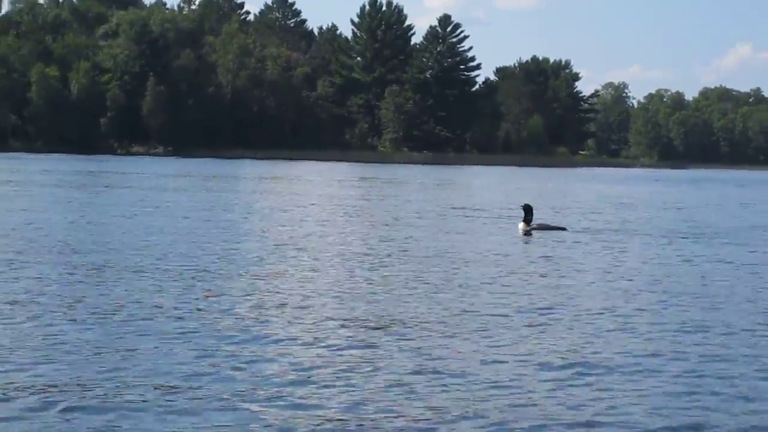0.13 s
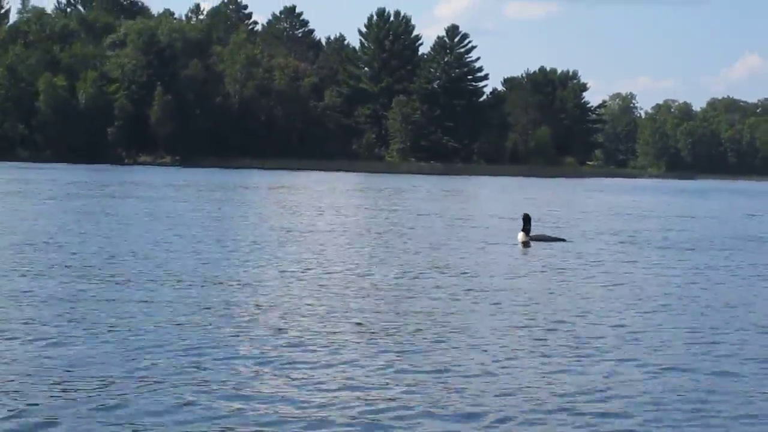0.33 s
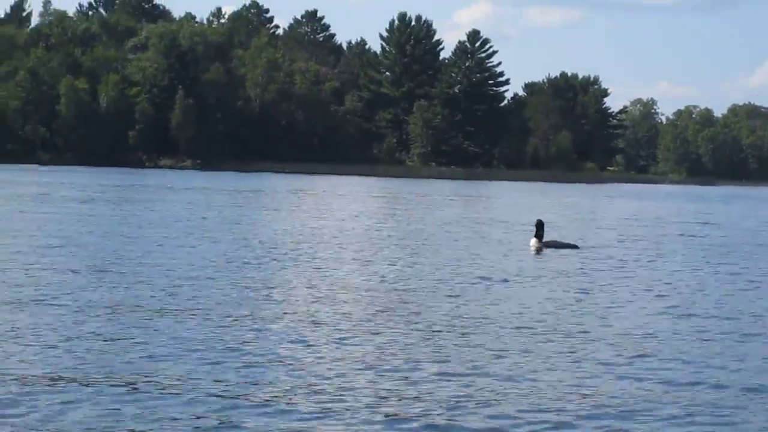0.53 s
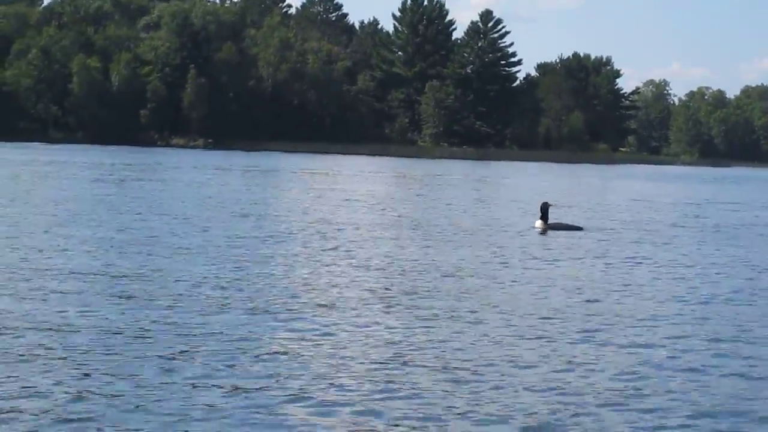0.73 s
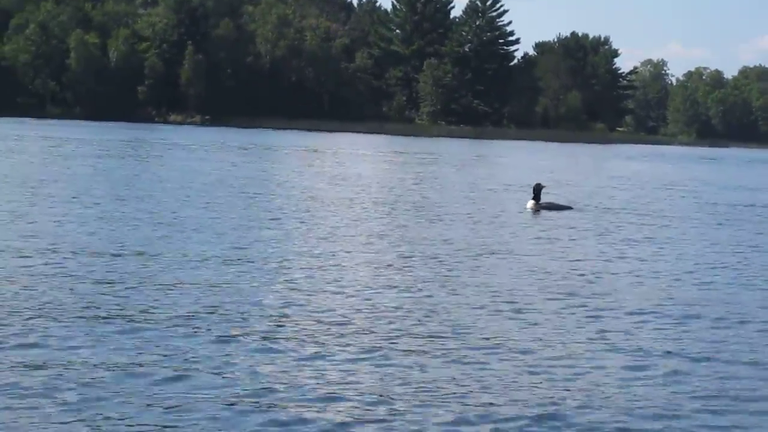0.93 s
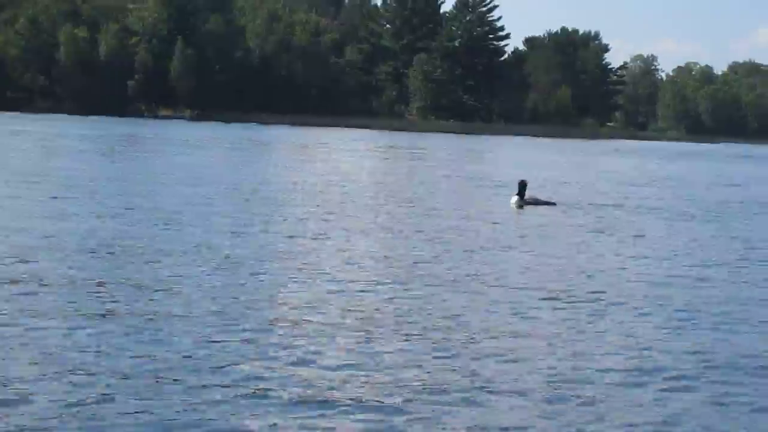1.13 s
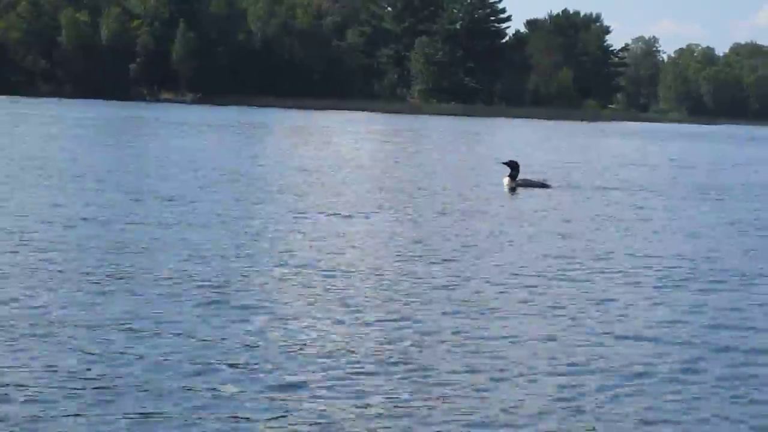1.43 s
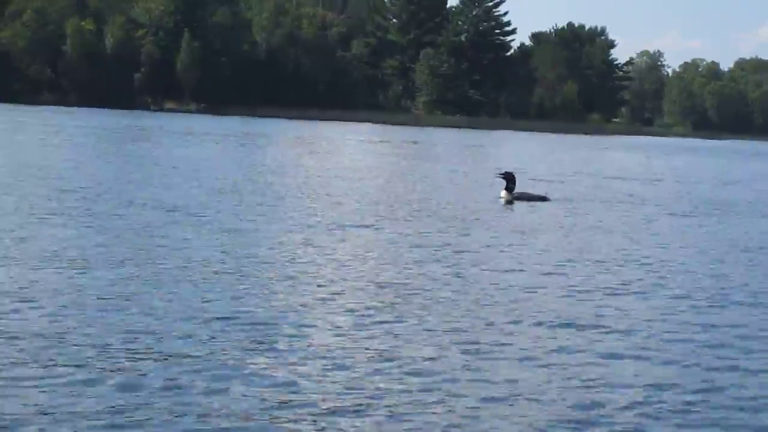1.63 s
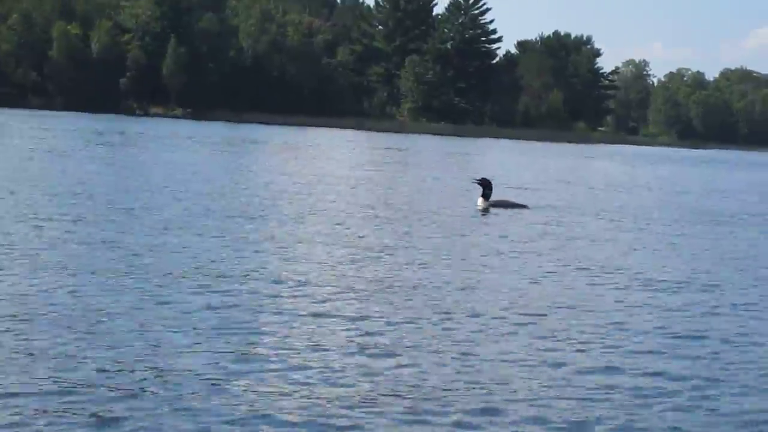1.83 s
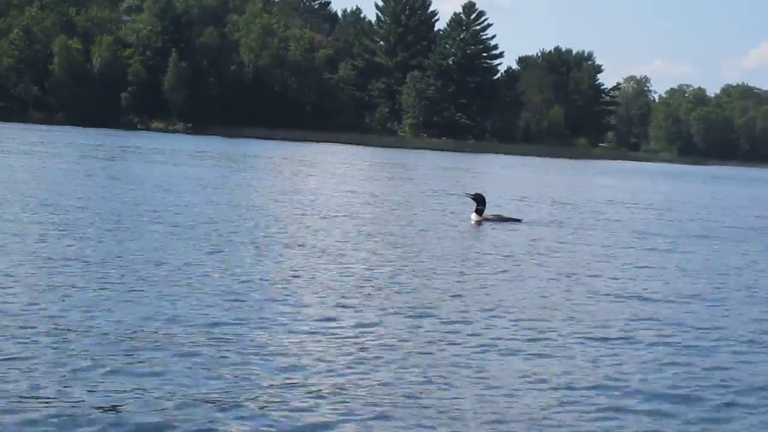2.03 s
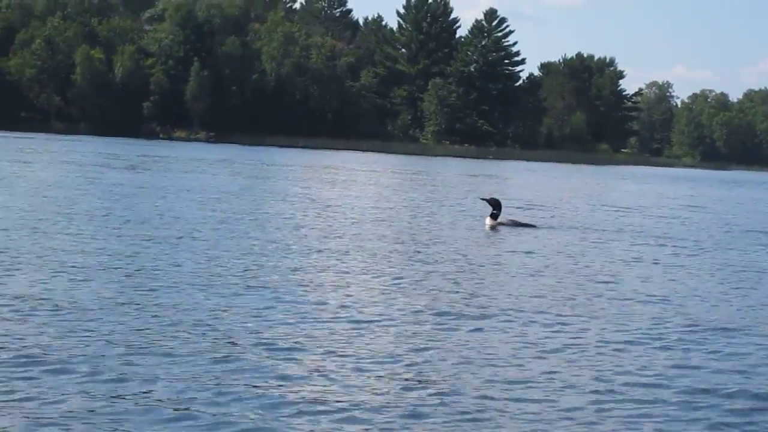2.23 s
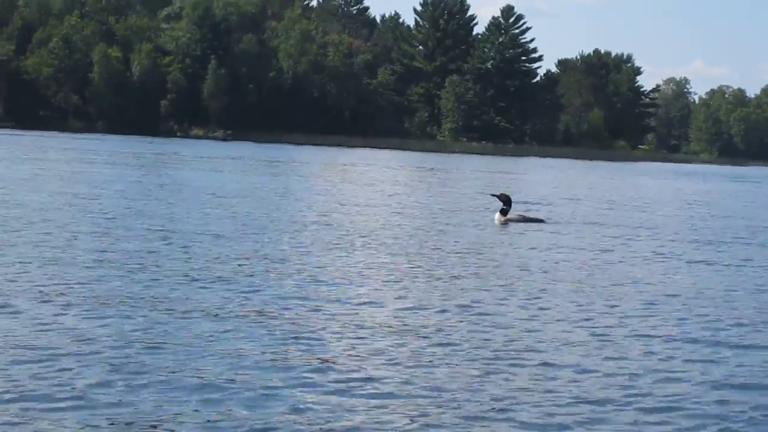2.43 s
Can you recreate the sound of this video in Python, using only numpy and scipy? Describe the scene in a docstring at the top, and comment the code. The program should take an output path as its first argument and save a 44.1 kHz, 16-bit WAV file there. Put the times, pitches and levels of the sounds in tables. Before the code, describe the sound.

A loon's tremolo calls dominate. Soft air and water wash with faint camera motor hum and thin whine opens alone. At 0.23 seconds a short low note breaks up into a loud, clear quaver, swinging rapidly about ten times a second until 0.83, then a faint low sigh. Only background and slight wind bumps follow. A similar, slightly longer call runs 1.7 to 2.35; the wash closes, ending around 2.6.

```python
"""First comes a soft wash of air and water with the hum of a camera's motors; then a loon calls twice.
Each call is a low note, a break up to a high quaver and a low sigh, built from overtones on a swinging pitch.
The wash is shaped noise, the hum is two sets of sines with a thin whine on top, and wind adds low bumps.
A fast gain control presses everything down under the loud tops of the quaver."""
import sys
import numpy as np
from scipy import signal
from scipy.io import wavfile
from scipy.ndimage import uniform_filter1d

SR = 44100
rng = np.random.default_rng(int(sys.argv[2]) if len(sys.argv) > 2 else 0)


def convert_level_to_amplitude(level_db):
    """Map a level in decibels to its linear amplitude factor."""
    exponent = np.asarray(level_db, float) / 20
    return 10 ** exponent


def dump_mix(stems):
    """Bounce the given channels to the path in sys.argv[1] as a 16-bit WAV at rate SR."""
    frames = np.atleast_2d(stems).T  # one column per channel
    limited = np.clip(frames, -1, 1)  # hard clip at full scale
    pcm = np.round(limited * 32767).astype(np.int16)
    wavfile.write(sys.argv[1], SR, pcm)


N = 114660  # length in samples

# Turning points of the three parts of each call, one list per call; the levels add to the voice below
# [t/s, pitch f/Hz, effort level/dB, second overtone level/dB, higher overtones level/dB]
LEAD_IN_NOTES = [
    [(.226, 678, -50, -15, -7.5), (.238, 664, -35.5, -3.5, -4), (.244, 702, -24.5, 3, -3),
     (.262, 724, -24, 1.5, 4.5), (.285, 696, -25, -6.5, 4), (.303, 640, -33.5, -8, 0),
     (.322, 685, -22, -9.5, 1.5), (.336, 784, -17.5, -2, 2), (.344, 843, -16, 3, -6.5),
     (.349, 900, -34.5, 17, 0)],
    [(1.68, 641, -44, 5.5, -2), (1.695, 644, -36, -7.5, -10), (1.702, 706.5, -24.5, 4, -1.5),
     (1.722, 738.6, -20.5, 1, 2.5), (1.745, 703, -25, -7.5, 0), (1.764, 665, -28, -11, 0),
     (1.778, 704, -20, -9.5, -0.5), (1.786, 779, -15.5, -5, -2), (1.792, 841, -20, 4, 1.5),
     (1.797, 900, -32, -7, -6)],
]
QUAVER_NOTES = [
    [(.345, 1215, -33.5, -11, -2), (.351, 1200, -14.5, 4, -5.5), (.358, 1175, -13.5, 4, 3),
     (.402, 886, -15.5, -2, -22), (.454, 1206, -14, 3.5, 5), (.501, 882, -17.5, 1, -17.5),
     (.553, 1204, -12, 3.5, 6), (.603, 873.6, -16.5, -2.5, -16.5), (.658, 1176, -12.5, 4, 4),
     (.714, 873, -18, -4, -17.5), (.74, 933, -21, 5, -13), (.771, 1070, -16.5, 5, 0),
     (.805, 950, -20, -27, -20), (.832, 870, -30.5, -8, 3)],
    [(1.791, 1230, -37, -11, -9), (1.799, 1216, -13.5, -7, -4), (1.815, 1211, -12, 4, 1),
     (1.86, 914, -16, -6.5, -13.5), (1.908, 1238, -11, 13, 1), (1.959, 939, -16, -8.5, -13.5),
     (2.005, 1237, -12.5, 11, 1), (2.057, 922, -17, -11, -16.5), (2.105, 1220, -9, 8.5, 0),
     (2.155, 909, -14, -11, -16.5), (2.207, 1173, -12, 4, 2), (2.262, 914, -17.5, -15, -18.5),
     (2.307, 978, -20, -3, -17.5), (2.328, 950, -20.5, -17, -32), (2.348, 900, -30, -6, -13)],
]
SIGH_NOTES = [
    [(.82, 645, -45, 0, -9), (.83, 603, -39.5, 0, -7), (.845, 592, -41, 0.0062, -1),
     (.864, 560, -48, 0, -5), (.88, 564, -45, 0, -9)],
    [(2.34, 625, -54, 0.0077, -14), (2.35, 602, -37, 0, -10), (2.358, 600, -42, 0.0092, -9),
     (2.368, 580, -74, 0.0051, -9)],
]
# Strength of each overtone in the low notes and in the quaver [multiple of the pitch, level/dB]
LOW_OVERTONES = [(1, -1.5), (2, 1), (3, -18), (4, -27), (5, -29), (6, -33), (7, -29.5), (8, -32.5),
                 (9, -40.5), (10, -33), (11, -31.5), (12, -36), (13, -55), (14, -40), (15, -47), (16, -53),
                 (17, -53), (18, -52), (19, -59)]
HIGH_OVERTONES = [(1, 1.5), (2, -18), (3, -22), (4, -25), (5, -34.5), (6, -43), (7, -32), (8, -38.5),
                  (9, -43), (10, -63), (11, -47.5), (12, -59.5)]
# Resonances of windpipe and throat [f/Hz, level/dB]
THROAT_COLOUR = [(600, 7.5), (900, -1.5), (1000, 3), (1120, 6), (1230, 7), (1450, 4), (1800, -10),
                 (2500, -9), (2900, -0.5), (3250, 10.5), (3600, -1.5), (4300, 2.5), (4800, -1.5), (5200, 5),
                 (5600, -2), (6000, -4.5), (6500, 0), (7200, -9.5), (8500, -3.5), (11000, 2),
                 (12300, -19.5), (13500, 1), (15500, 5.5)]
# The bird's head is turned differently in each call, one row per call
# [anti-resonance f/Hz, its lift on a steep climb f/Hz, treble colour as a list of [f/Hz, level/dB]]
HEAD_TURNS = [(1074.4, 11.3, [(1500, -0.5), (2400, -4.5), (3200, 1), (4500, -1.5), (6000, -4.5),
              (8500, -5.5), (13000, -7)]), (1067, 2.6, [(1500, 0), (2400, -3.5), (3200, -5), (4500, 0),
              (6000, 0), (8500, -1), (13000, -1.5)])]
# Overtones that swell or break off as the pitch passes certain heights
# [pitch f/Hz, second level/dB, third and fourth level/dB, higher level/dB]
SHOULDER_BREAKS = [(890, 1, 1, 2.5), (900, -3.5, -1, -4), (950, 2.5, 4.5, 1.5), (974, -0.5, 3, 6),
                   (1045, 1, -0.5, -2), (1096, -4.5, -5, 7), (1154, -4, -7.5, -2.5), (1252, 3.5, -6, 2.5),
                   (1200, 1, 0, 1.5), (1215, -3, -3.5, 5)]
# Soft low bumps of wind on the microphone [t/s, peak level/dB, length t/s]
WIND_BUMPS = [(.54, -49, 0.036), (1.45, -49, .05), (1.58, -46, 0.032), (2.174, -42.5, 0.14),
              (2.325, -46.5, 0.092)]
# Overtones of the two camera motors [multiple of the motor's frequency, level/dB]
DRIVE_OVERTONES = [(2, -62), (3, -54.5), (6, -48.5), (9, -53), (10, -49.5), (12, -59.5), (13, -51.5),
                   (17, -60.5), (18, -54.5), (19, -59.5), (20, -55), (24, -62), (26, -58), (28, -58),
                   (31, -61), (32, -71), (33, -76), (40, -67.5)]
SPINDLE_OVERTONES = [(1, -53.5), (2, -44.5)]
# Thin wobbling whine of the camera [f/Hz, level/dB before it pulses]
WHINE_TONES = [(3535, -68), (5285, -77.5), (5430, -71), (5572.8, -69.5), (5845, -72.5), (6147, -78),
               (7867, -75)]
# Colour of the air and water wash, only its shape counts [f/Hz, level/dB per Hz]
WASH_COLOUR = [(15, -40), (30, -27), (70, -6), (140, -10), (280, -3.5), (450, -3.5), (800, -1.5),
               (1000, -3), (1200, 0), (1500, -7.5), (1850, -9.5), (2200, -13), (3000, -20), (3350, -24.5),
               (3550, -25), (4500, -28.5), (5500, -30), (6500, -32.5), (10000, -35), (15500, -41.5)]
# Loudness of the wash over time [t/s, level/dB]
WASH_LOUDNESS = [(0, -37), (0.501, -38), (1, -37), (1.35, -37.5), (1.701, -37.5), (2.2, -37.5),
                 (2.6, -40.5)]

# "climb" runs from -1 (pitch falling steeply) to 1 (rising steeply)
CLIMB_SCALE_HZ_PER_S = 4000
RISE_DB = -1  # times climb: softer on the way up, louder on the way down
BROADNESS = 1.4  # above 1: the quaver lingers high and hurries through its dips
CORNER_S, EDGE_S = .004, .003  # smoothing of the pitch corners; fade at each end of a note
JITTER = 0.002  # rms share of the pitch
BREATH_DB = -24.5  # noise around the pitch, before the note's effort
RASP_DB, RASP_RISE_DB = -44, 0.5  # breath hiss, before effort; the rise is times climb
STEEPER = 0.088  # each higher overtone follows its column by this much more
OVERTONE_RISE_DB = 4  # for the third overtone on a steep rise
LOW_DULLING_DB, HIGH_DULLING_DB = 0.7, 1.4  # taken off that rise for each further overtone
SHIMMER_DB, CLIMB_SHIMMER_DB = 1.6, 1.2  # random flicker of the overtones; the extra is for rising
DEAD_WIDTH_HZ, DEAD_FILL_HZ = 100, 5.7  # anti-resonance: width, and how far its bottom is filled
DEAD_NARROWING = 0.17  # share of its width lost on a steep rise, gained on a fall
BUMP_LOW_HZ, BUMP_TOP_HZ = 30, 90
DRIVE_HZ, SPINDLE_HZ = 64.1, 157.8
HUM_WAVER_DB, HUM_WAVER = 1, 0.00086  # rms waver in level, and as a share of the frequency
WHINE_WOBBLE_HZ, WHINE_SWING_RAD, WHINE_PULSE = 29.97, 1.3, .4  # pulse as a share of the level
SCAN_HZ, SCAN_DB = 15734, -84.5
PATCHY_DB = 1.5  # rms unevenness of the wash
KNEE_DB, ATTACK_S, RECOVER_DB_PER_S = -15.5, .004, 200  # gain control


def evened(x):
    """Scales a sound so that its average strength (rms) is 1."""
    return x / np.sqrt(np.mean(x ** 2) + 1e-20)


def read(points, hz):
    """Reads a level between table points, with frequency on a log axis as in hearing."""
    f, value = np.transpose(points)
    return np.interp(np.log(hz + 1), np.log(f + 1), value)


def drift(rate_hz, count=N):
    """Random wandering of rms 1: noise with everything faster than rate_hz smoothed away."""
    settle = SR // 4  # skip the filter's start
    noise = rng.standard_normal(count + settle)
    return evened(signal.lfilter(*signal.butter(2, rate_hz, fs=SR), noise)[settle:])


def add(mix, s, sound):
    """Mixes a sound in at s seconds, since sounds in air simply add up."""
    part = mix[round(s * SR):][:len(sound)]
    part += sound[:len(part)]


def pitch_curve(t, s, pitch):
    """Swings the pitch smoothly from one turning point to the next, in Hz."""
    place = np.interp(t, s, np.arange(len(s)))
    k = np.minimum(place.astype(int), len(s) - 2)
    up = pitch[k + 1] > pitch[k]
    height = np.where(up, place - k, 1 - place + k)
    arc = np.sin(np.pi / 2 * (1 - (1 - height) ** BROADNESS)) ** 2
    hz = np.minimum(pitch[k], pitch[k + 1]) + abs(pitch[k + 1] - pitch[k]) * arc
    return uniform_filter1d(hz, round(CORNER_S * SR))


def breath(turns, climb):
    """Leaking air: noise that rides on the pitch, plus a band of hiss."""
    on_pitch = convert_level_to_amplitude(BREATH_DB) * drift(200, len(turns)) * np.cos(turns)
    band = signal.butter(1, [2500, 7000], "band", fs=SR)
    hiss = evened(signal.lfilter(*band, rng.standard_normal(len(turns))))
    return on_pitch + convert_level_to_amplitude(RASP_DB + RASP_RISE_DB * climb) * hiss


def note(points, voice, dulling_db, dead_hz, lift_hz, colour):
    """The voice sounds overtones of a swinging pitch; throat and head strengthen some, weaken others."""
    s, pitch, effort_db, second_db, over_db = np.transpose(points)
    t = s[0] + np.arange(SR * 3 // 5) / SR
    hz = pitch_curve(t, s, pitch)
    climb = np.tanh(np.gradient(hz) * SR / CLIMB_SCALE_HZ_PER_S)
    rising = np.maximum(climb, 0)
    turns = 2 * np.pi * np.cumsum(hz * (1 + JITTER * drift(220, len(t)))) / SR  # phase in radians
    out = breath(turns, climb)

    at_hz, *breaks_db = np.transpose(SHOULDER_BREAKS)
    second_break, middle_break, upper_break = (np.interp(hz, at_hz, b) for b in breaks_db)
    column_db = np.interp(t, s, over_db)
    dead_width = DEAD_WIDTH_HZ * (1 - DEAD_NARROWING * climb)
    for m, db in voice:
        # near the anti-resonance the overtone nearly vanishes and its phase turns
        off = m * hz - dead_hz - lift_hz * climb
        dead = (off + 1j * DEAD_FILL_HZ) / (off + 1j * dead_width)
        if m == 1:
            extra_db = 0
        elif m == 2:
            extra_db = np.interp(t, s, second_db) + second_break
        else:
            rise_db = (OVERTONE_RISE_DB - dulling_db * (m - 3)) * rising
            shimmer_db = (SHIMMER_DB + CLIMB_SHIMMER_DB * rising) * drift(49, len(t))
            extra_db = column_db * (1 + STEEPER * (m - 3)) + rise_db + shimmer_db
            extra_db = extra_db + (middle_break if m < 5 else upper_break)
        level_db = db + extra_db + read(THROAT_COLOUR, m * hz) + read(colour, m * hz)
        out -= convert_level_to_amplitude(level_db) * (dead * np.exp(1j * m * turns)).real

    edges = np.clip(np.minimum(t - s[0], s[-1] - t) / EDGE_S, 0, 1)
    effort = convert_level_to_amplitude(np.interp(t, s, effort_db) + RISE_DB * climb)
    return s[0], np.sqrt(2) * out * edges * effort


def loon():
    """Both calls: the voice breaks from a low lead-in up to the quaver, then drops to a sigh."""
    bird = np.zeros(N)
    for head, lead_in, quaver, sigh in zip(HEAD_TURNS, LEAD_IN_NOTES, QUAVER_NOTES, SIGH_NOTES):
        add(bird, *note(lead_in, LOW_OVERTONES, LOW_DULLING_DB, *head))
        add(bird, *note(quaver, HIGH_OVERTONES, HIGH_DULLING_DB, *head))
        add(bird, *note(sigh, LOW_OVERTONES, LOW_DULLING_DB, *head))
    return bird


def bumps():
    """Wind pushes on the microphone: short swells of very low noise."""
    t = np.arange(N) / SR
    low = evened(signal.lfilter(*signal.butter(1, BUMP_LOW_HZ, "high", fs=SR), drift(BUMP_TOP_HZ)))
    swells = sum(convert_level_to_amplitude(db) * np.exp(-((t - s) / length * 2) ** 2) for s, db, length in WIND_BUMPS)
    return low * swells


def motor(motor_hz, overtones):
    """A turning motor hums at multiples of one frequency, which wavers a little."""
    out = np.zeros(N)
    turns = np.cumsum(motor_hz * (1 + HUM_WAVER * drift(1.5))) / SR
    for m, db in overtones:
        level = convert_level_to_amplitude(db + HUM_WAVER_DB * drift(15.6))
        out += level * np.sin(2 * np.pi * (m * turns + rng.random()))
    return out


def whine():
    """Thin high tones whose level and phase wobble together."""
    t, out = np.arange(N) / SR, np.zeros(N)
    for hz, db in WHINE_TONES:
        wobble = np.cos(2 * np.pi * (WHINE_WOBBLE_HZ * t + rng.random()))
        out += convert_level_to_amplitude(db) * (1 + WHINE_PULSE * wobble) * np.sin(2 * np.pi * hz * t + WHINE_SWING_RAD * wobble)
    return out


def camera():
    """Two motor hums, the whine and a faint steady scan tone, all made of sines."""
    scan = convert_level_to_amplitude(SCAN_DB) * np.sin(2 * np.pi * SCAN_HZ * np.arange(N) / SR)
    hum = motor(DRIVE_HZ, DRIVE_OVERTONES) + motor(SPINDLE_HZ, SPINDLE_OVERTONES)
    return np.sqrt(2) * (hum + whine() + scan)  # sqrt(2) turns sine peaks into rms levels


def wash():
    """Air and water: random short spectra, louder and softer in drifting patches."""
    frames, hz = N // 256 + 5, np.fft.rfftfreq(1024, 1 / SR)
    real, imaginary, patches = rng.standard_normal((frames, 513, 3)).T
    patches = uniform_filter1d(patches, size=10, axis=0)  # smooth over frequency
    patches = evened(uniform_filter1d(patches, size=10, axis=1))  # and over time
    level_db = read(WASH_COLOUR, hz)[:, None] + PATCHY_DB * patches
    spectra = (real + 1j * imaginary) * convert_level_to_amplitude(level_db)
    noise = evened(signal.istft(spectra, nperseg=1024, noverlap=768)[1][:N])
    return convert_level_to_amplitude(np.interp(np.arange(N) / SR, *np.transpose(WASH_LOUDNESS))) * noise


def scene():
    """Bird, lake, wind and camera add up in one channel."""
    return (loon() + wash() + bumps() + camera())[None]


def low_pass(x):
    """Removes everything above the highest recorded frequency."""
    return signal.sosfilt(signal.butter(12, 15680, fs=SR, output="sos"), x)


def record(dry):
    """Gain control: takes off what rises above the knee, grips within milliseconds and lets go quickly."""
    power_db = 10 * np.log10(abs(uniform_filter1d(dry[0] ** 2, size=80)) + 1e-12)
    # hold each peak and let it sink at a steady rate
    fall = np.arange(N) * RECOVER_DB_PER_S / SR
    held_db = np.maximum.accumulate(power_db + fall) - fall
    over_db = np.maximum(held_db - KNEE_DB, 0)
    keep = np.exp(-1 / (ATTACK_S * SR))
    grip_db = signal.lfilter([1 - keep], [1, -keep], over_db)
    mix = dry / convert_level_to_amplitude(grip_db)
    return low_pass(mix)


dry = scene()
out = record(dry)
dump_mix(out)
```